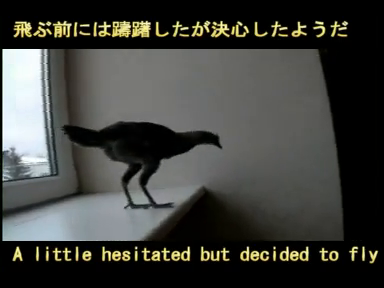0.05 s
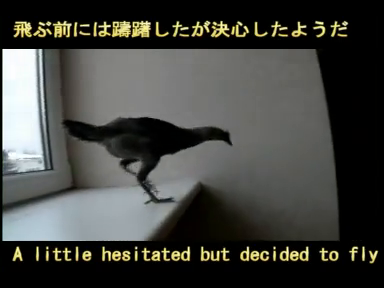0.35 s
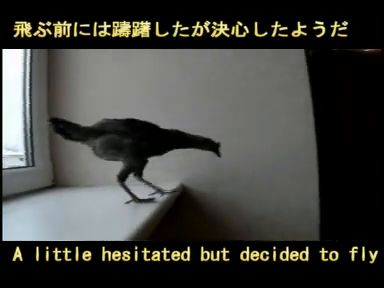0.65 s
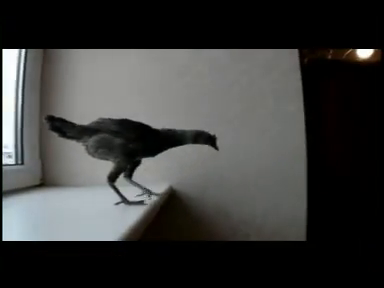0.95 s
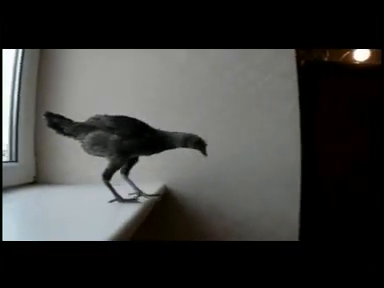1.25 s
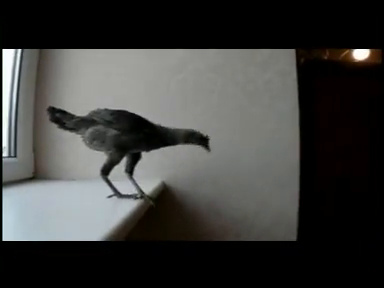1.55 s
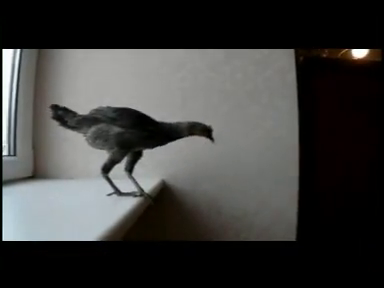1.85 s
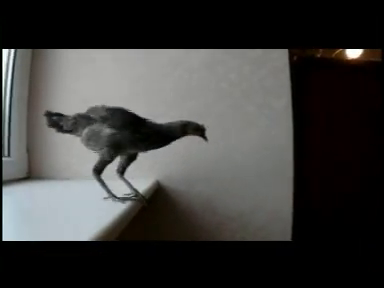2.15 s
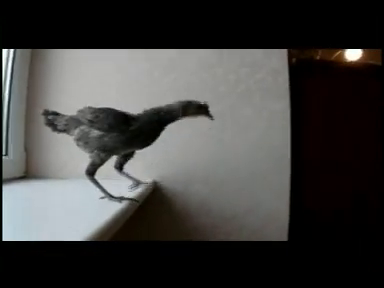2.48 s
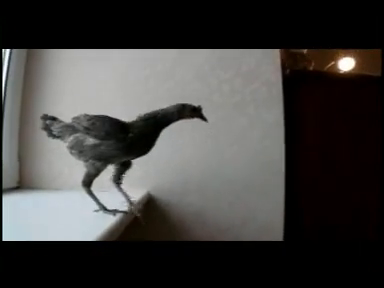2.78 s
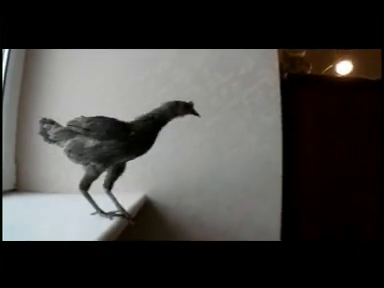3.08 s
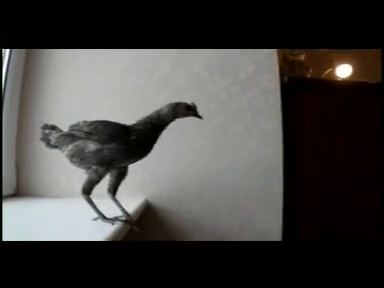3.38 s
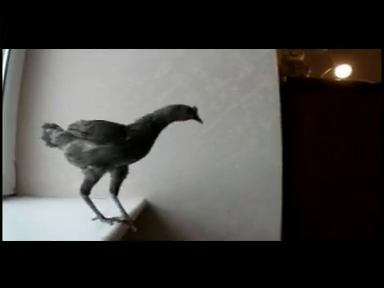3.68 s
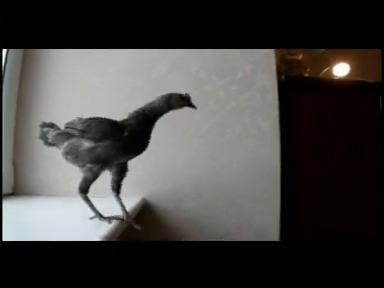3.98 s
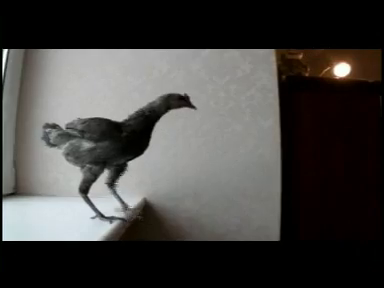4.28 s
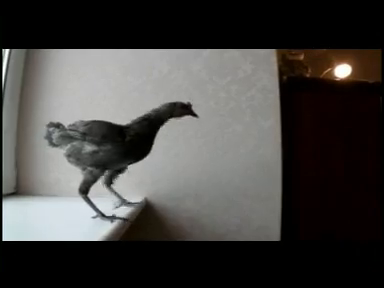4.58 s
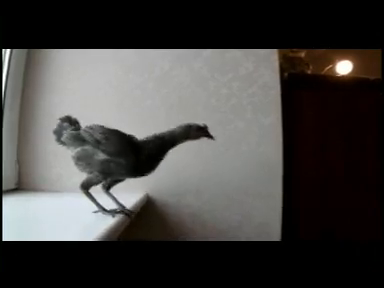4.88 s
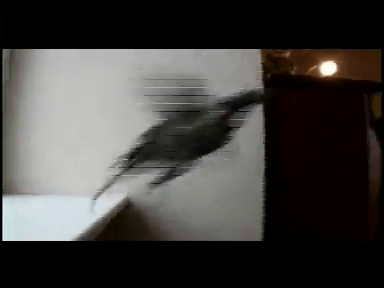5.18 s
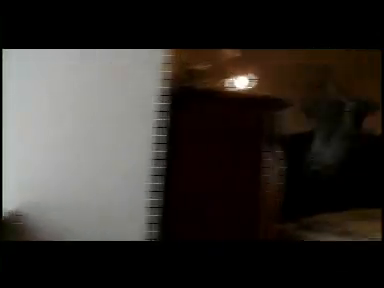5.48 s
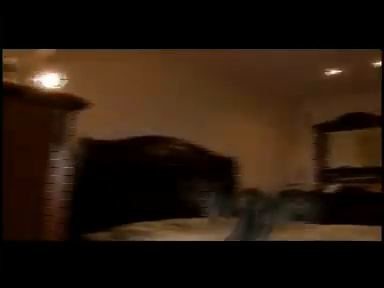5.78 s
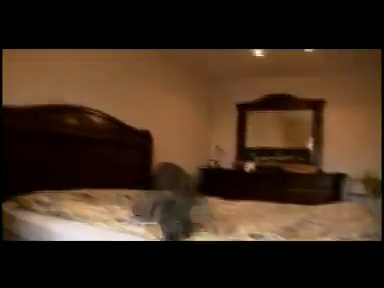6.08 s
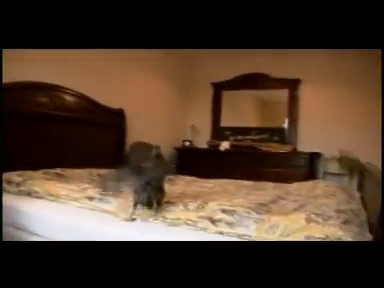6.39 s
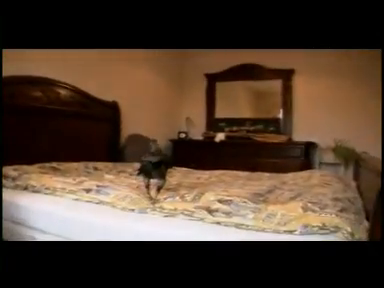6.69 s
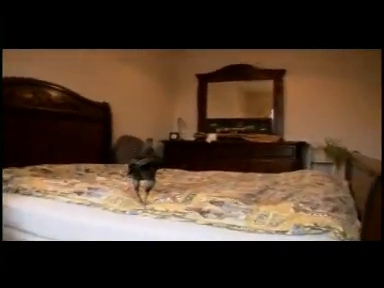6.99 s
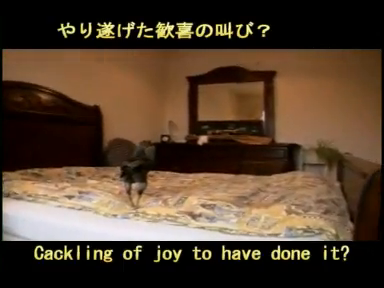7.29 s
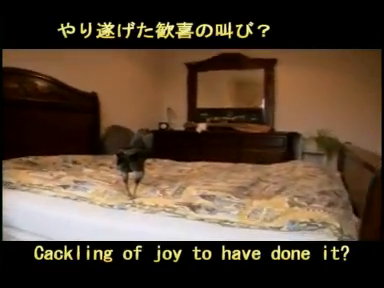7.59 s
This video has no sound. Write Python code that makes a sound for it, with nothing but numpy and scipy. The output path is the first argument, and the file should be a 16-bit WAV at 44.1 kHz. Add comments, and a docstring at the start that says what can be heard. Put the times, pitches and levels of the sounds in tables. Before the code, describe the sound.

A quiet bedroom with a faint steady hush and light reverberation. In the first second a young chicken's claws scrape on a windowsill, with two clear, light knocks of its feet at about 0.3 and 0.6 seconds. A faint rush swells and fades away by about 2.5 seconds. Around 3 seconds the taps and small scratches resume, and from 3.3 to 5.7 seconds the bird gives about ten soft, very short clucks between occasional steps. At about 6 seconds its wings burst into rapid, clapping beats, with a faint low thud as it lands on the bed at 6.3 seconds and a few weaker flaps after. From 6.3 to 7 seconds come six loud, high, rising squawks in quick succession, growing rougher; these are the loudest sounds. They sink into four quieter clucks, each lower in pitch, until about 7.6 seconds.

```python
"""A quiet bedroom. A young chicken paces the windowsill: its feet excite the board's damped modes, its
claws scrape by stick-slip friction, and it clucks softly. It flaps across the room, lands on the bed and
cackles in loud squawks that sink back into clucks. Each call is a rising harmonic tone from the syrinx,
filtered by the throat and beak. The room reverberates after every sound; early on, a faint rush swells
and fades over the steady room tone."""
import sys
import numpy as np
from scipy import signal
from scipy.fft import rfft, irfft, next_fast_len
from scipy.io import wavfile
from scipy.ndimage import map_coordinates

SR = 44100
rng = np.random.default_rng(int(sys.argv[2]) if len(sys.argv) > 2 else 0)


def int16_out(signal):
    """Quantize to a 16-bit WAV file."""
    q = np.round(np.clip(np.atleast_2d(signal).T, -1, 1) * 32767)
    wavfile.write(sys.argv[1], SR, q.astype(np.int16))


N = 337365

ROOM_DECAY = [(150, 0.54), (530, 0.39), (1400, 0.36), (1720, 0.57), (2100, .42), (3700, 0.59),
              (12000, 0.51)]  # reverberation time: frequency_hz, t60_s
COHERENCE = [(100, 0.6), (500, 0.51), (1200, 0.65), (2800, 0.54), (5500, 0.44), (10000, 0)]  # left-right likeness of the diffuse field: frequency_hz, correlation
ROOM_TONE_SPECTRUM = [(25, -11.5), (60, -19.5), (100, -21), (240, -16.5), (450, -17.5), (800, -22),
                      (2200, -29.5), (6000, -35), (14000, -39.5), (15800, -39)]  # steady hush and hiss: frequency_hz, gain_db
RUSH_SPECTRUM = [(120, -46), (200, -18), (435, -0.5), (581, -1.5), (624, 2.5), (1020, -1), (2210, -7),
                 (5550, -16), (15000, -35.5)]  # background rush: frequency_hz, gain_db
RUSH_SWELLS = [(.25, 0.26, -58.5), (1.04, 0.14, -53.5), (1.35, 0.92, -55.5)]  # Gaussian swells of the rush: peak_s, half_width_s, level_db
CLAW_SLIDES = [(0.016, .17, -57), (.26, .083, -41), (0.438, .064, -47.5), (0.57, .007, -50),
               (0.618, 0.075, -42), (.846, 0.007, -46.5), (1.117, 0.024, -49.5), (2.893, .025, -55.5),
               (2.994, .018, -45), (3.214, .057, -60), (3.503, .14, -54), (4.713, .015, -57),
               (4.839, .1, -53.5), (5.865, 0.04, -56)]  # claws sliding on the sill: start_s, length_s, relative_level_db
FRICTION_SPECTRUM = [(200, -13), (900, -1), (2200, 3), (5000, -3.5), (9000, -7.5), (15000, -21)]  # a sliding claw: frequency_hz, gain_db
FOOTFALLS = [(.265, -41.5, -9), (.309, -20, 1.5), (.6122, -20.5, 1), (2.35, -52, -11), (2.917, -35, 5),
             (3.0, -27.5, 6), (3.016, -24.5, -5), (3.8, -28, -6), (4.154, -28, -5.5), (4.284, -54, -2),
             (5.561, -43.5, -11)]  # feet on the sill: start_s, level_db, hardness_db_per_octave
SILL_MODES = [(148.7, -13.5, 0.14), (243, -2.5, 0.039), (332.4, 0.5, 0.046), (413, -7.5, 0.077),
              (545, -3.5, 0.042), (664, -4, 0.035), (940, 2, 0.0091), (1344, -8.5, 0.017)]  # resonances of the board: frequency_hz, gain_db, t60_s
CLICK_SPECTRUM = [(500, -30), (1200, -19), (1800, 6), (2400, 3.5), (3100, -3), (4500, -11.5), (12000, -30)]  # a claw tip striking the board: frequency_hz, gain_db
# soft notes: start_s, end_pitch_hz, level_db, roughness (noise share of the power, capped in syrinx_note)
CLUCK_NOTES = [(3.309, 572.6, -33, 0.54), (3.543, 710, -33.5, 0.5), (3.752, 820, -36.5, 0.34),
               (3.937, 952, -34.5, 0.2), (4.14, 938, -40, 0.22), (4.562, 670.6, -30.3, 0.5),
               (4.804, 906, -33.5, .19), (5.02, 1330, -39.7, 0), (5.466, 708, -31.5, 0.5),
               (5.74, 754, -34, 0.36), (7.067, 838.5, -23.5, 0.28), (7.199, 770, -23.8, .06),
               (7.358, 665.4, -25, 0.29), (7.534, 556.3, -26, 0.39)]
BEAK_CLOSED = [(90, -32), (220, -20.5), (350, -7), (560, -5), (900, 4), (1300, -1.5), (1570, -14),
               (2100, -14.5), (2450, -26.5), (2800, -30), (3400, -30), (5200, -32), (6500, -40),
               (15000, -51)]  # vocal tract response, beak closed: frequency_hz, gain_db
BEAK_OPEN = [(200, -21), (600, -19), (850, -13.5), (1050, 6.5), (1300, 5.5), (1700, 7.5), (2100, -2.5),
             (2700, -9), (3300, -11), (4300, -5), (5100, -8.5), (6500, -19), (8500, -23), (15000, -37.5)]  # vocal tract response, beak open: frequency_hz, gain_db
# a soft rustle of unfolding wings, then four wingbeats: start_s, length_s, swish_db, clap_db
WING_MOTIONS = [(5.934, 0.07, -49.5, -70), (5.968, .02, -25.5, -23), (6.066, .014, -41, -16.8),
                (6.149, .046, -31, -20), (6.244, .046, -26, -30)]
FEATHER_SPECTRUM = [(180, -9.5), (300, -3.5), (526, -6), (590, -5.5), (641, 0.5), (2520, -7), (2790, -8),
                    (5760, -17.5), (8560, -18.5), (15500, -33.5)]  # vanes and quills: frequency_hz, gain_db
PUSHED_AIR_SPECTRUM = [(25, -29), (70, -14), (250, 2.5), (600, 5.5), (1500, -28), (4000, -55)]  # air displaced by a wing: frequency_hz, gain_db
QUILT_SPECTRUM = [(25, -20), (70, 8), (130, -21), (260, 6), (600, -7), (2000, -25)]  # thud of the bedding: frequency_hz, gain_db
# open-beak cries: start_s, end_pitch_hz, level_db, bend_fraction (share of the cry before the pitch leaps)
SQUAWK_NOTES = [(6.279, 1506, -12, .46), (6.385, 1674, -13.5, .44), (6.516, 1739, -13.5, 0.24),
                (6.654, 1737, -13.8, 0.22), (6.791, 1664, -13.6, .3), (6.945, 1693, -14, .36)]

# clucks in each place: length_s, usual_start_hz, tilt_db_per_octave, gape_fraction, wet_db, pan_db
ON_SILL = (0.0285, 440, -2.3, 0.08, -4, 3.5)
ON_BED = (0.042, 545, 1.2, 0.12, 0.46, 2.5)
# squawking voice: start_hz, roughness, tilt_db_per_octave, undertone_db
FRESH = (1290, 0.02, -0.4, -18)
STRAINED = (1200, 0.095, 1.8, -5)

LANDING_S, TOP_HZ = 6.268, 15800
T = np.arange(SR * 6 // 10) / SR  # time within one event, in seconds


def amp(db):
    """Amplitude ratio of a level in decibels."""
    return 10 ** (np.asarray(db) / 20)


def unit(x):
    """Normalisation to an rms of 1."""
    return x / np.sqrt(np.mean(x ** 2) + 1e-20)


def along(points, hz):
    """Interpolation of (frequency_hz, value) points on a logarithmic frequency axis."""
    frequencies, values = np.transpose(points)
    return np.interp(np.log(hz + 1), np.log(frequencies), values)


def tilted(hz, tilt_db, pivot_hz):
    """Spectral tilt: a gain sloping by tilt_db per octave, flat beyond two octaves from the pivot."""
    return amp(tilt_db * np.clip(np.log2((hz + 1) / pivot_hz), -2, 2))


def filtered(x, response):
    """Linear filtering: the spectrum is multiplied by a frequency response."""
    size = x.shape[-1]
    padded = next_fast_len(size + 8192)
    return irfft(rfft(x, padded) * response(np.fft.rfftfreq(padded, 1 / SR)), padded)[..., :size]


def noise(spectrum, tilt_db=0, pivot_hz=3000):
    """Spectral shaping of white noise, one event long, with an rms of 1."""
    white = rng.standard_normal(len(T))
    return unit(filtered(white, lambda hz: amp(along(spectrum, hz)) * tilted(hz, tilt_db, pivot_hz)))


def wobble(rate_hz):
    """Random modulation: a smooth curve through rate_hz random values a second."""
    return map_coordinates(rng.standard_normal(int(rate_hz) + 4), [T * rate_hz])


def arch(length_s, exponent):
    """Half-sine envelope; a smaller exponent flattens its top."""
    return np.abs(np.sin(np.pi * np.clip(T / length_s, 0, 1))) ** exponent * (T < length_s)


def diffuse(size):
    """Diffuse-field coherence: stereo noise, partly alike in the bass and unrelated in the top treble."""
    def mid_side_gains(hz):
        angle = np.arccos(np.clip(along(COHERENCE, hz), -1, 1)) / 2
        return np.array([np.cos(angle), np.sin(angle)])
    mid, side = filtered(rng.standard_normal((2, size)), mid_side_gains)
    return np.array([mid + side, mid - side])


def add_in_room(out, start_s, sound, wet_db, pan_db):
    """Reverberation: the direct sound plus its convolution with an exponentially decaying diffuse tail."""
    hz, t, bands = signal.stft(diffuse(len(T)), SR, nperseg=256)
    decay = amp(-60 * t / along(ROOM_DECAY, hz)[:, None])
    tail = signal.istft(bands * decay, SR, nperseg=256)[1][:, :len(T)]
    build_up = np.clip(T / 0.0048 - 0.5, 0, 1)
    reverb = signal.fftconvolve(sound[None], tail * build_up, axes=1)[:, :len(T)]
    direct = sound * amp([[pan_db / 2], [-pan_db / 2]])
    heard = direct + amp(wet_db) * np.std(sound) * unit(reverb)
    slot = out[:, max(0, round(start_s * SR)):][:, :len(T)]
    slot += heard[:, :slot.shape[1]]


def background():
    """Diffuse noise: steady room tone, and a soft rush from all sides under slow amplitude modulation."""
    room_tone = unit(filtered(diffuse(N), lambda hz: amp(along(ROOM_TONE_SPECTRUM, hz))))
    wide_noise = diffuse(N) + 1.2 * rng.standard_normal((2, N))
    rush = unit(filtered(wide_noise, lambda hz: amp(along(RUSH_SPECTRUM, hz))))
    t = np.arange(N) / SR
    swells = sum(amp(db) * np.exp(-((t - peak_s) / width_s) ** 2) for peak_s, width_s, db in RUSH_SWELLS)
    return amp(-60) * room_tone + swells * rush


def claw_scrapes(out, brightest_db=-53):
    """Stick-slip friction: claws catch and slip, duller when pressed harder or softer than a light scrape."""
    takeoff_s = CLAW_SLIDES[-1][0]
    fidgets = [(start_s, 0.015, -61.5) for start_s in rng.uniform(0, takeoff_s, size=7)]
    for start_s, length_s, db in CLAW_SLIDES + fidgets:
        catches = amp(3 * wobble(600) + 3 * wobble(90) + 2 * wobble(30))
        tilt_db = 2.5 - 0.35 * abs(db - brightest_db)
        slips = noise(FRICTION_SPECTRUM, tilt_db) * catches * arch(length_s, 0.11)
        rms = np.sqrt(np.sum(slips ** 2) / (length_s * SR))
        add_in_room(out, start_s, amp(db - 3.5) * slips / rms, wet_db=-4.5, pan_db=2)


def claw_click(db, t60_s=0.033):
    """Impact transient: a hard claw tip gives a bright burst of noise that decays exponentially."""
    return amp(db - 60 * T / t60_s) * noise(CLICK_SPECTRUM)


def footsteps(out):
    """Modal vibration: each step rings the sill; a harder one favours high modes and a louder click."""
    low_cut = signal.butter(3, 130, "high", fs=SR, output="sos")  # light knocks, without a low thump
    attack = 1 - np.exp(-T / 0.00081)
    for start_s, db, hardness in FOOTFALLS:
        ring = np.zeros(len(T))
        for hz, mode_db, t60_s in SILL_MODES:
            envelope = amp(mode_db + rng.normal(0, 2.8) - 60 * T / t60_s) * tilted(hz, hardness, 510)
            ring += envelope * np.sin(2 * np.pi * hz * T + rng.uniform(0, 2 * np.pi))
        knock = signal.sosfilt(low_cut, ring * attack)
        click = claw_click(db - 27 + 1.1 * hardness)
        add_in_room(out, start_s, amp(db) * knock / np.abs(knock).max() + click, wet_db=-3, pan_db=1.5)
    add_in_room(out, 0.6122, claw_click(-26.5), wet_db=-13, pan_db=3)  # one claw comes down squarely


def syrinx_note(length_s, start_hz, end_hz, bend, db, roughness, tilt_db, gape,
                undertone_db, glide_width, fade_db, flare_db, rasp_tilt_db):
    """Source-filter principle: the tightening syrinx sweeps harmonics up through the throat's resonances."""
    def tract(hz):
        resonance_db = (1 - gape) * along(BEAK_CLOSED, hz) + gape * along(BEAK_OPEN, hz)
        return amp(resonance_db) * tilted(hz, tilt_db, 1300) * (hz < TOP_HZ)
    roughness = np.clip(roughness, 0, 0.4)
    progress = np.minimum(T / length_s, 1)
    tension = 0.5 + 0.5 * np.tanh((progress - bend) / glide_width)
    jitter = (0.006 + 0.04 * roughness) * wobble(450)
    pitch_hz = (start_hz + (end_hz - start_hz) * tension) * np.exp(jitter)
    phase = 2 * np.pi * np.cumsum(pitch_hz) / SR
    # period doubling: every second cycle differs, putting undertones halfway between the harmonics
    orders = np.arange(1, 31)[:, None] / 2
    sounding = T < length_s
    # the overtones flare up as the membrane tightens
    flare = amp(flare_db * (tension[sounding] - 1) * np.clip(orders - 1, 0, 2) / 2)
    strength = np.where(orders % 1, amp(undertone_db), 1) * flare * tract(orders * pitch_hz[sounding])
    partials = np.sin(orders * phase[sounding] + rng.uniform(0, 2 * np.pi, orders.shape))
    voiced = np.zeros(len(T))
    voiced[sounding] = unit(np.sum(strength * partials, axis=0))
    turbulence = rng.standard_normal(len(T)) * (1 + np.cos(phase))  # air escapes once in every cycle
    rasp = unit(filtered(turbulence, lambda hz: tract(hz) * tilted(hz, rasp_tilt_db, 2700)))
    effort = amp(db + fade_db * (progress - 0.5)) * arch(length_s, 0.9)
    return effort * (np.sqrt(1 - roughness) * voiced + np.sqrt(roughness) * rasp)


def clucks(out, usual_end_hz=720.7):
    """Formant filtering by a nearly shut beak; from the farther bed, clucks are longer and more reverberant."""
    for start_s, end_hz, db, roughness in CLUCK_NOTES:
        place = ON_SILL if start_s < LANDING_S else ON_BED
        length_s, usual_start_hz, tilt_db, gape, wet_db, pan_db = place
        start_hz = usual_start_hz * np.sqrt(end_hz / usual_end_hz)
        tilt_db += 3.5 * np.exp(-roughness / 0.073)  # clear notes are brighter
        cluck = syrinx_note(length_s, start_hz, end_hz, 0.4, db, roughness, tilt_db, gape,
                            undertone_db=-13.5, glide_width=0.313, fade_db=-2, flare_db=0,
                            rasp_tilt_db=-0.2)
        add_in_room(out, start_s, cluck, wet_db, pan_db)


def feather_rustle():
    """Flow noise: air over the vanes gives a hiss with a rapidly fluctuating level."""
    return unit(noise(FEATHER_SPECTRUM, 1.26) * amp(2.3 * wobble(384)))


def wings(out, period_s=0.095, weaker_db=10.5, clap_fraction=0.37):
    """Flow noise and impact: the wings unfold, then each beat swishes, claps the quills and leaves a wake."""
    last_s, length_s, swish_db, clap_db = WING_MOTIONS[-1]
    # three weaker beats keep the bird's balance after landing
    balancing = [(last_s + beat * period_s, length_s, swish_db - weaker_db, clap_db - weaker_db)
                 for beat in (1, 2, 3)]
    for start_s, length_s, swish_db, clap_db in WING_MOTIONS + balancing:
        swish = amp(swish_db) * arch(length_s, 0.33) * feather_rustle()
        add_in_room(out, start_s, swish, wet_db=-2, pan_db=1.5)
        clap = amp(-60 * T / 0.038) * noise(FEATHER_SPECTRUM, -0.83)
        wake = arch(0.08, 0.22) * (amp(-22) * feather_rustle() + amp(-17.5) * noise(PUSHED_AIR_SPECTRUM))
        clap_s = start_s + clap_fraction * length_s
        add_in_room(out, clap_s, amp(clap_db) * (clap + wake), wet_db=-1.5, pan_db=0)


def landing(out):
    """Cushioned impact: the feet sink into the quilt, and the slow contact gives a low thud."""
    thud = amp(-32) * arch(0.025, 0.94) * noise(QUILT_SPECTRUM)
    add_in_room(out, LANDING_S, thud, wet_db=-25, pan_db=0.3)


def squawks(out, length_s=0.045, gape=0.91, strain_time_s=0.22):
    """Period doubling under strain: the open-beak cries gain undertones, roughness and brightness."""
    first_s = SQUAWK_NOTES[0][0]
    for start_s, end_hz, db, bend in SQUAWK_NOTES:
        strain = 1 - np.exp(-((start_s - first_s) / strain_time_s) ** 2)
        voice = (1 - strain) * np.array(FRESH) + strain * np.array(STRAINED)
        start_hz, roughness, tilt_db, undertone_db = voice
        squawk = syrinx_note(length_s, start_hz, end_hz, bend, db, roughness, tilt_db, gape,
                             undertone_db, glide_width=0.1407, fade_db=-7, flare_db=4.5, rasp_tilt_db=2.2)
        add_in_room(out, start_s, squawk, wet_db=1.5, pan_db=1.5)


def scene():
    """Superposition: the bird's sounds add to the background of the room."""
    out = background()
    for source in (claw_scrapes, footsteps, clucks, wings, landing, squawks):
        source(out)
    return out


def record(dry):
    """Band limiting and DC offset: nothing passes above TOP_HZ, and each channel has a constant bias."""
    bias = np.array([[0.0087], [-0.0027]])
    return filtered(dry, lambda hz: hz < TOP_HZ) + bias


dry = scene()
out = record(dry)
int16_out(out)
```